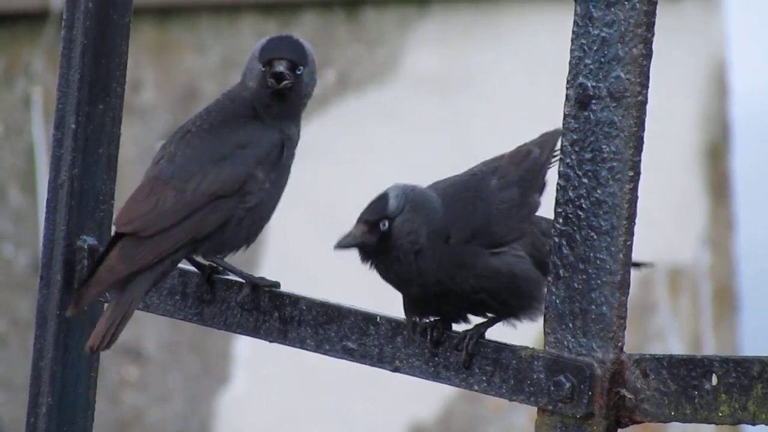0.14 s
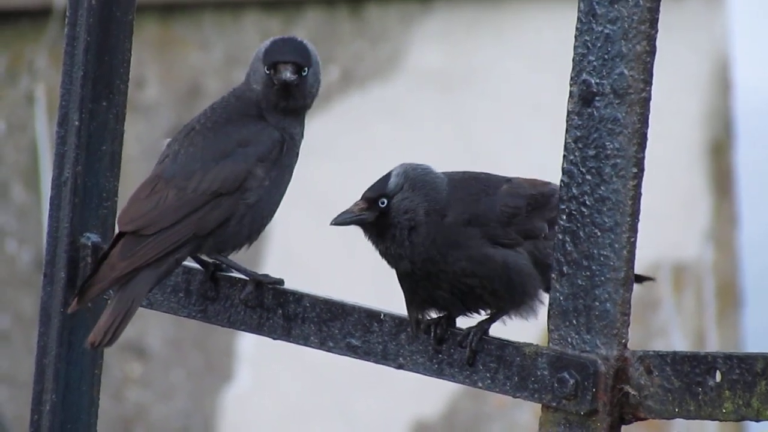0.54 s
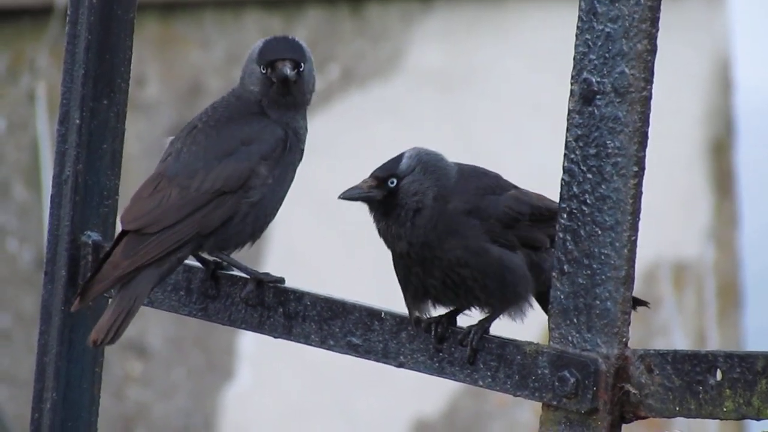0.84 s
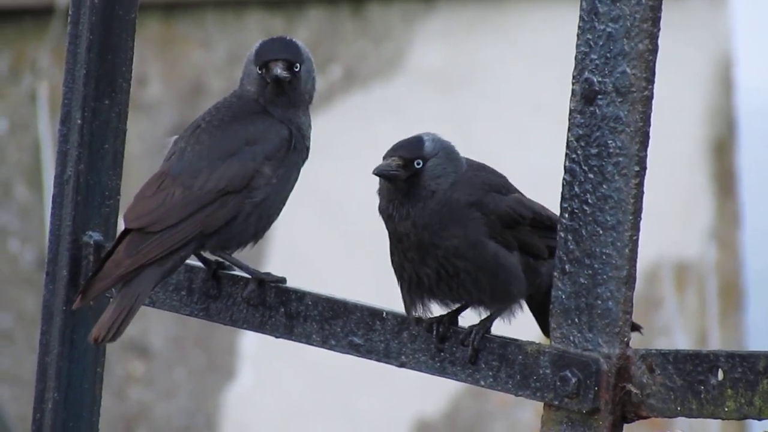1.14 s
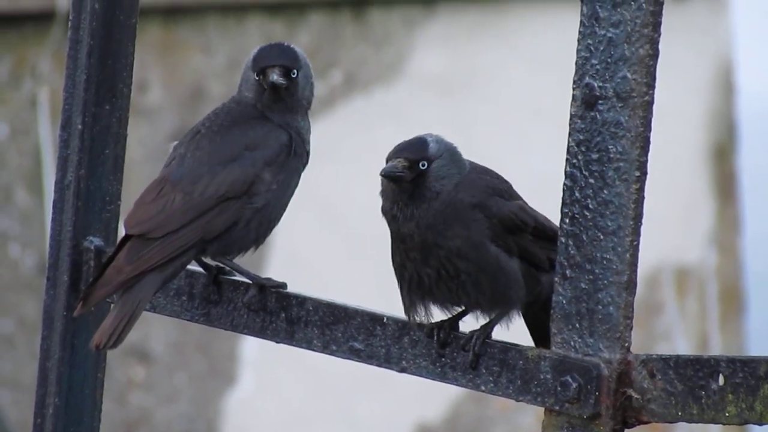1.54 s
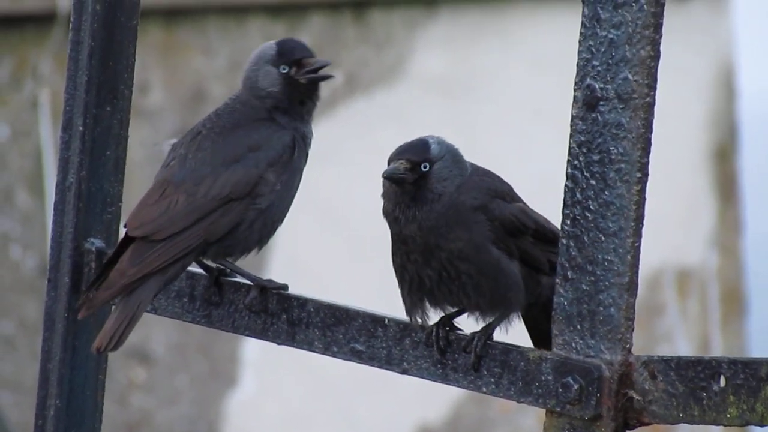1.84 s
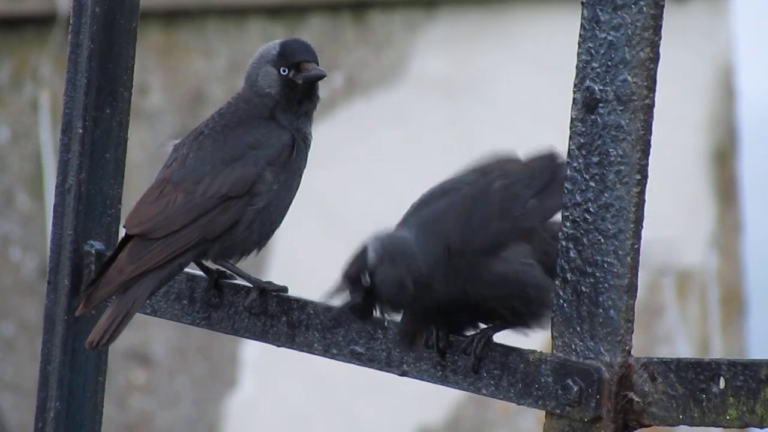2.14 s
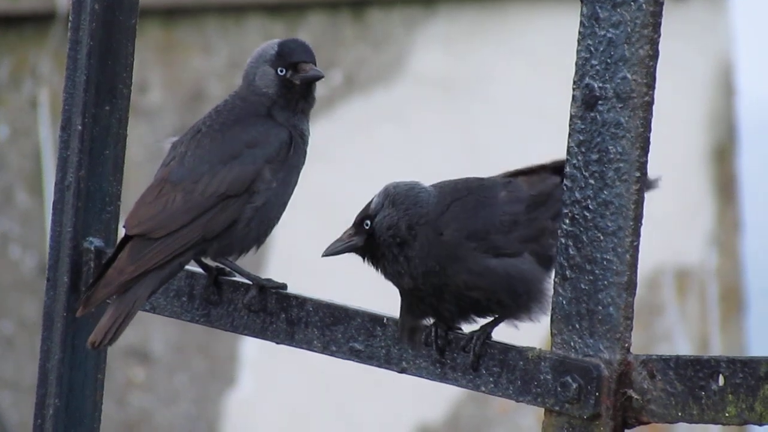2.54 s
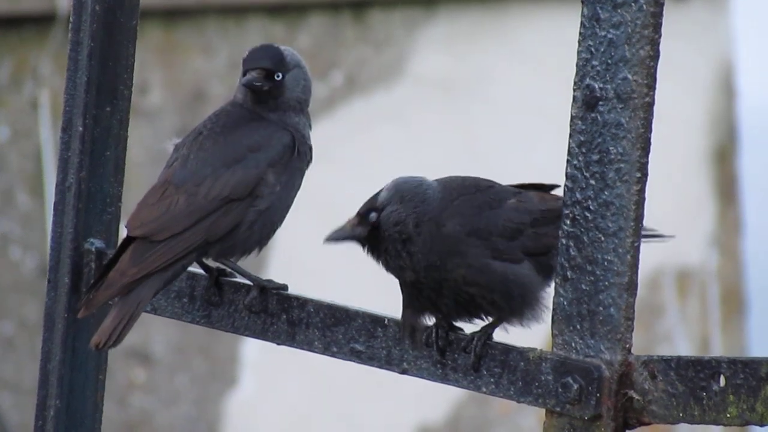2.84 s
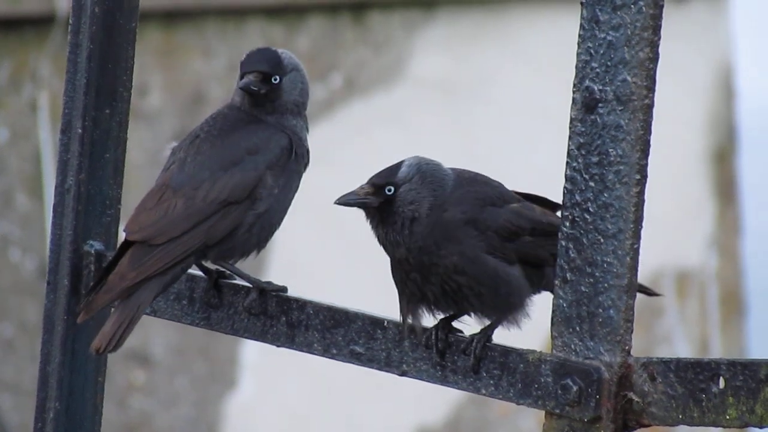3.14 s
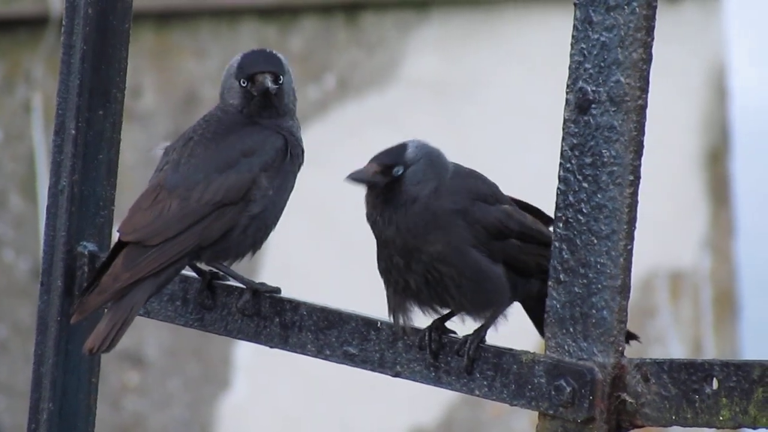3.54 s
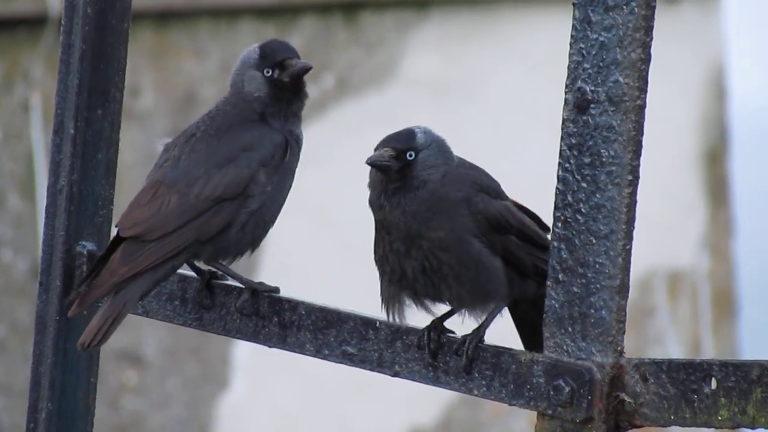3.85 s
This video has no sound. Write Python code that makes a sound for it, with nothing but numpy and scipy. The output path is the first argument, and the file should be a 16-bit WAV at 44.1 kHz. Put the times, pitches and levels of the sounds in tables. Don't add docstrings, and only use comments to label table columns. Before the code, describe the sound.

Harsh jackdaw calls close to a stereo microphone in a walled outdoor yard, separated by long gaps; a far gull yelps in the first half, tiny birds chirp later, low wind buffets early.

```python
import sys
import numpy as np
from scipy import signal
from scipy.fft import rfft, irfft
from scipy.io import wavfile
from scipy.ndimage import uniform_filter1d

SR = 44100
rng = np.random.default_rng(int(sys.argv[2]) if len(sys.argv) > 2 else 0)


def convert_level_to_amplitude(level_db):
    exponent = np.asarray(level_db, float) / 20
    return 10 ** exponent


def materialize(psi):
    bounded = np.clip(np.atleast_2d(psi).T, -1, 1)
    quanta = np.round(bounded * 32767).astype(np.int16)
    wavfile.write(sys.argv[1], SR, quanta)


N = 176400
BRIGHT_FROM_HZ, TOP_HZ = 3600, 13900


def at_hz(points, hz):
    f, value = np.transpose(points)
    return np.interp(np.log(np.maximum(hz, 1)), np.log(f), value)


def rms_one(x):
    return x / np.sqrt(np.mean(x ** 2) + 1e-20)


def drift(rate_hz, size):
    r = np.exp(-2 * np.pi * rate_hz / SR)
    white = rng.standard_normal(size + SR)
    slow = signal.lfilter([1], [1, -2 * r, r * r], white)[SR:]
    return rms_one(slow - slow.mean())


def coloured(x, gain):
    n = x.shape[-1]
    return irfft(rfft(x) * gain(np.arange(n // 2 + 1) * SR / n), n)


def bump(s, length):
    return np.exp(-((np.arange(N) / SR - s) / length) ** 2)


def resonance(hz, centre, width):
    return 1 / (1 + ((hz - centre) / width * 2) ** 2)


# t/s, level/dB, pitch f/Hz, brightness/dB
CAWS = [
    [(.219, -40, 674, -14), (.23, -22, 738.4, -3.5), (.252, -14, 727.6, 2), (.262, -14.5, 658, 6.5),
     (.272, -18, 601.8, 10), (.284, -18.5, 534.8, 4.5), (.326, -23.5, 464, -2.5), (.376, -29.5, 392, -2),
     (.4, -42, 363, -13)],
    [(1.94, -31, 587.5, -3), (1.951, -23, 772.4, 2.5), (1.969, -14.5, 759.3, -4.5),
     (1.972, -16, 761.4, 9.5), (1.99, -16.5, 620.4, 3.5), (2.012, -20, 521.7, 6), (2.034, -23, 477.4, -3.5),
     (2.085, -26, 420.4, 1.5), (2.112, -46, 390, -20)],
    [(3.706, -44, 520.5, -13), (3.72, -20.5, 805.7, -3), (3.738, -20.5, 757, 4), (3.741, -14.5, 754.7, 6),
     (3.758, -17, 583, 3), (3.772, -19.5, 523, 4.5), (3.796, -23, 474, 0.5), (3.855, -29, 370, 3.5),
     (3.895, -39, 311.5, -24)],
]
CAW_BREATH = [
    (.06, .58),
    (.22, .65),
    (.12, .6),
]
# t/s, level of fourth and fifth partials before it/dB
CAW_BREAKS = [
    (0.246, -4),
    (1.9705, 0),
    (3.7395, -10),
]
# f/Hz, width/Hz, level/dB
CAW_THROAT = [(1439, 200, 4), (1873, 700, 2), (2600, 900, -6), (4300, 630, -13.5), (5370, 540, -4),
              (6240, 1400, -4.5), (9400, 1800, -8.5), (12200, 1600, -16)]


def caws():
    calls = zip(CAWS, CAW_BREATH, CAW_BREAKS)
    return sum(call(rows, breath, CAW_THROAT, .0025, voice_break) for rows, breath, voice_break in calls)


# t/s, level/dB, pitch f/Hz, brightness/dB
TCHAKS = [
    [(0, -13.5, 1074, -3), (.01, -18, 977, -15.5), (.02, -24, 915, -9), (.032, -27.5, 838, -10.5),
     (.056, -41, 672, -31)],
    [(2.1575, -14.5, 1149, -5), (2.167, -18.5, 1125, 0.5), (2.176, -16, 1094, -1.5),
     (2.19, -20.5, 970, -5.5), (2.213, -30.5, 787, -9.5), (2.228, -44, 730, -18)],
]
TCHAK_BREATH = [
    (.15, .5),
    (.08, .5),
]
# f/Hz, width/Hz, level/dB
TCHAK_THROAT = [(1100, 1400, -12), (2200, 650, 3.5), (3040, 390, -35), (4500, 1900, -12),
                (6040, 1100, -1.5), (6950, 1700, -5.5), (9950, 1800, -8.5), (12400, 800, -23)]


def tchaks():
    return sum(call(rows, breath, TCHAK_THROAT, .002) for rows, breath in zip(TCHAKS, TCHAK_BREATH))


def call(rows, breath, peaks, wobble, voice_break=None):
    s, db, f0, bright_db = np.transpose(rows)
    i = np.arange(int(s[0] * SR), int(s[-1] * SR))
    t = i / SR
    db, f0, bright_db = (np.interp(t, s, column) for column in (db, f0, bright_db))
    f0 = uniform_filter1d(f0, size=200) * (1 + wobble * drift(120, len(i)))
    phase = 2 * np.pi * np.cumsum(f0) / SR
    rough = np.linspace(*breath, len(i))
    voice = syrinx(t, f0, phase, bright_db, peaks, voice_break)
    air = gated_breath(phase, bright_db, peaks)
    from_start = i - i[0] + 80 * (i[0] == 0)
    edge = np.clip(np.minimum(from_start, i[-1] - i) / 80, 0, 1)
    out = np.zeros(N)
    out[i] = edge * convert_level_to_amplitude(db) * (np.sqrt(1 - rough ** 2) * voice + rough * air)
    return out


def syrinx(t, f0, phase, bright_db, peaks, voice_break):
    k = np.arange(1, 41)[:, None]
    hz = k * f0
    flutter = drift(59, 40 * len(t)).reshape(40, -1)
    shimmer = convert_level_to_amplitude(3 * np.minimum(k / 4, 1) * flutter)
    if voice_break:
        break_partials(shimmer, t - voice_break[0], voice_break[1])
    gains = throat(peaks, hz) * shimmer * convert_level_to_amplitude(bright_db * (hz > BRIGHT_FROM_HZ)) * (hz < TOP_HZ)
    smear = .13 * k ** 2
    power = uniform_filter1d(np.sum(gains ** 2, axis=0), size=300) / 2
    return np.sum(gains * np.sin(k * phase + smear), axis=0) / np.sqrt(power)


def break_partials(shimmer, after, upper_before_db):
    third_db = np.where(after < 0, -10, 6.5 * np.exp(-after / .06))
    shimmer[3:5] *= convert_level_to_amplitude(upper_before_db * (after < 0))
    shimmer[2] *= convert_level_to_amplitude(uniform_filter1d(third_db, size=150))
    shimmer[1] *= convert_level_to_amplitude(-8 * np.clip(after / .01, 0, 1))


def gated_breath(phase, bright_db, peaks):
    puff = rng.standard_normal(len(phase)) * (1 + np.sin(phase)) ** 2
    low = coloured(puff, lambda hz: throat(peaks, hz) * (hz <= BRIGHT_FROM_HZ))
    high = coloured(puff, lambda hz: upper_throat(peaks, hz))
    spread = np.std(low + convert_level_to_amplitude(bright_db) * high)
    return (low + convert_level_to_amplitude(bright_db + 2.5) * high) / spread


def throat(peaks, hz):
    notch = convert_level_to_amplitude(-10 * resonance(hz, 3520, 420))
    low_cut = 1 / (1 + (.66 * peaks[0][0] / (hz + 1)) ** 6)
    power = sum(convert_level_to_amplitude(db) ** 2 * resonance(hz, centre, width) ** 2 for centre, width, db in peaks)
    return notch * low_cut * np.sqrt(power)


def upper_throat(peaks, hz):
    return throat(peaks, hz) * (hz > BRIGHT_FROM_HZ) * (hz < TOP_HZ)


# t/s, level/dB
CRACKS = [
    (1.9688, -14),
    (2.159, -25),
    (3.7392, -18),
]


def cracks():
    t = np.arange(N) / SR
    dies_s = .0047
    env = sum(convert_level_to_amplitude(db) * (t >= s) * np.exp(-np.maximum(t - s, 0) / dies_s) for s, db in CRACKS)
    return env * rms_one(coloured(rng.standard_normal(N), lambda hz: upper_throat(CAW_THROAT, hz)))


# f/Hz, left over right/dB
CAW_PAN = [(1500, 0.5), (2500, 3.5), (5500, 4.5), (9500, -3), (13000, 3)]
# f/Hz, lead of the left/rad
LAG = [(1500, 0.22), (6000, 0.39), (8000, 1.53), (10000, 0.5)]


def both_ears(near):
    def ear(side):
        return coloured(near, lambda hz: convert_level_to_amplitude(side * at_hz(CAW_PAN, hz) / 2) * np.exp(.5j * side * at_hz(LAG, hz)))
    return np.array([ear(1), ear(-1)])


# end t/s, length/s, level/dB
YELPS = [
    (0.085, 0.13, -28.5),
    (0.375, 0.15, -36),
    (0.628, 0.14, -33),
    (0.897, 0.14, -37),
    (1.174, 0.125, -37),
    (1.456, 0.12, -34),
    (1.778, 0.13, -36.5),
]


def gull():
    out = np.zeros(N + SR)
    top_at, top_hz = .357, 1382
    for end, length, db in YELPS:
        u = np.arange(int(length * SR)) / (length * SR)
        rise = .1326 * (1 - u / top_at) ** 2
        fall = .152 * (np.abs(u - top_at) / (1 - top_at)) ** 1.42
        hz = top_hz * (1 - np.where(u < top_at, rise, fall))
        phase = 2 * np.pi * np.cumsum(hz) / SR
        edge = np.clip(np.minimum(u, 1 - u) / .08, 0, 1)
        env = convert_level_to_amplitude(db + 2 * drift(79, len(u))) * edge
        early = convert_level_to_amplitude(-7 * np.clip(3 - 5 * u, 0, 1))
        ring = early * np.sqrt(resonance(hz, 1225, 164))
        overtone = convert_level_to_amplitude(-20 + 3 * drift(77, len(u)))
        i = int((end - length + 1) * SR)
        out[i:i + len(u)] += env * (ring * np.sin(phase) + overtone * np.sin(2 * phase))
    return out[SR:]


# t/s, length/s, level/dB,
# from f/Hz, to f/Hz
CHIRPS = [(0.203, .012, -33.5, 2200, 2200), (0.458, 0.03, -40, 2200, 2020), (1.233, 0.026, -52, 4300, 5440),
          (1.25, 0.038, -53, 5300, 4500), (1.354, 0.024, -52, 4270, 5060), (2.763, 0.07, -45, 1466, 1380),
          (2.763, 0.028, -50, 2950, 2796), (2.48, 0.016, -50, 4750, 5360), (2.486, 0.038, -48, 5350, 5250),
          (2.509, 0.025, -52, 5200, 4680), (2.558, 0.054, -54, 5150, 5270), (2.608, 0.045, -55, 5200, 5180),
          (2.717, 0.031, -50, 4000, 4200), (2.76, 0.04, -56, 4450, 4160), (2.757, 0.051, -55, 5950, 5560),
          (2.828, 0.032, -56, 4200, 4140), (2.93, 0.043, -52.5, 4230, 4130),
          (2.981, 0.038, -51, 4050, 4000), (3.133, 0.02, -45, 4900, 5160), (3.142, 0.026, -47, 5300, 5270),
          (3.161, 0.026, -51, 5100, 5000), (3.165, 0.014, -51, 4800, 4400), (3.218, 0.04, -56, 5250, 5240),
          (3.265, 0.049, -57, 5250, 5120)]


def chirps():
    out = np.zeros(N)
    for s, length, db, from_hz, to_hz in CHIRPS:
        n = int(length * SR)
        hz = np.linspace(from_hz, to_hz, n) * (1 + .011 * drift(110, n))
        i = int(s * SR)
        out[i:i + n] += convert_level_to_amplitude(db) * np.hanning(n) ** .5 * np.sin(2 * np.pi * np.cumsum(hz) / SR)
    return out


# f/Hz, density level/dB
RUSTLE = [(4000, -0.5), (4900, 10.5), (6000, -13), (8000, 0), (11000, -20)]


def rustle():
    noise = coloured(rng.standard_normal(N), lambda hz: convert_level_to_amplitude(at_hz(RUSTLE, hz)) * (hz > 3500))
    swells = bump(.607, .077) + convert_level_to_amplitude(-4) * bump(.72, .03)
    return convert_level_to_amplitude(-49 + 4 * drift(60, N)) * swells * rms_one(noise)


# f/Hz, T60/s
YARD_T60 = [(1000, 1.29), (2300, 1.25), (3200, 0.87), (6000, 0.72), (12000, 0.33)]
# f/Hz, level/dB
YARD_COLOUR = [(1200, 10.5), (2200, 15), (2900, 21), (3600, 18), (5000, 17), (9000, 15.5)]


def yard(x):
    t = np.arange(SR) / SR
    tail = 0
    for hz in 500 * 2 ** np.arange(0, 5, .5):
        band = coloured(rng.standard_normal((2, SR)),
                        lambda f: (f >= hz) * (f < hz * np.sqrt(2)) / (1 + f / 5800))
        tail = tail + band * convert_level_to_amplitude(at_hz(YARD_COLOUR, hz) - 60 * t / at_hz(YARD_T60, hz))
    tail = tail * np.clip(t / .005, 0, 1) * convert_level_to_amplitude(1.06 * drift(13.3, SR))
    tail = tail / np.sqrt(np.sum(tail ** 2) / 2)
    return convert_level_to_amplitude(-13) * signal.fftconvolve(x[None], tail, axes=1)[:, :N]


# t/s, level/dB
AIR = [
    (0, -48.5),
    (4, -50),
]
# f/Hz, density level/dB
HUM = [(24, -43), (40, -1), (102, -7), (223, -11.5), (402, -13.5), (1440, -1.5), (1930, -4), (5160, -14.5),
       (14100, -31)]
# f/Hz, width/Hz, level/dB
HUM_PEAKS = [
    (96.6, 17, 12),
    (415, 446, 16.5),
    (1134, 260, 6),
]
# f/Hz, left-right likeness (-1 to 1)
LIKENESS = [(60, 0.8), (230, 0.95), (910, 0.85), (3520, 0.37), (13700, -0.19)]


def hum():
    def gain(hz):
        humps = sum(db * resonance(hz, centre, width) for centre, width, db in HUM_PEAKS)
        return convert_level_to_amplitude(at_hz(HUM, hz) + humps)

    def part(sign):
        return coloured(rng.standard_normal(N),
                        lambda hz: gain(hz) * np.sqrt(1 + sign * np.clip(at_hz(LIKENESS, hz), 0, 1)))
    mid, side = part(1), part(-1)
    s, db = np.transpose(AIR)
    level = convert_level_to_amplitude(5 + np.interp(np.arange(N) / SR, s, db) + .5 * drift(1.96, N))
    return level * rms_one(np.array([mid + side, mid - side]))


# t/s, length/s, level/dB
GUSTS = [(0.057, 0.028, -27.5), (.005, 0.0047, -22.5), (0.187, 0.06, -43), (0.302, 0.033, -50),
         (0.47, 0.046, -39), (0.623, 0.039, -51.5), (0.781, 0.019, -42), (0.997, 0.033, -41),
         (1.119, 0.061, -36.5), (1.323, 0.016, -61), (1.454, 0.014, -43.5), (1.59, 0.095, -56),
         (1.757, 0.05, -52), (1.992, 0.036, -53), (2.13, 0.025, -39), (2.2, 0.03, -44.5),
         (0.902, 0.75, -59.5)]
GUST_CUT_HZ = [
    [70],
    [150],
]


def wind():
    noise = coloured(rng.standard_normal((2, N)),
                     lambda hz: hz / (hz + 25) / (1 + (hz / np.array(GUST_CUT_HZ)) ** 2))
    exposure = convert_level_to_amplitude(np.array([[0], [4.5]]))
    env = sum(bump(s, length) * convert_level_to_amplitude(db) for s, length, db in GUSTS) * exposure
    lumps = convert_level_to_amplitude(2.5 * np.array([drift(7.2, N), drift(24.0, N)]))
    return rms_one(noise) * env * lumps


def scene():
    near = caws() + tchaks() + cracks()
    far_gull, small = gull(), chirps()
    to_walls = near + convert_level_to_amplitude(9) * far_gull + convert_level_to_amplitude(4) * small
    return both_ears(near) + far_gull + small + rustle() + yard(to_walls) + hum() + wind()


def top_cut(x):
    return signal.sosfilt(signal.butter(12, 15800, fs=SR, output="sos"), x)


def record(dry):
    return top_cut(dry)


dry = scene()
out = record(dry)
materialize(out)
```